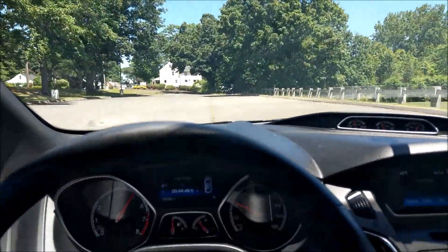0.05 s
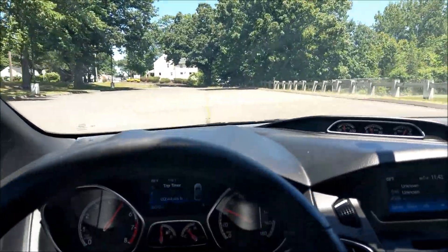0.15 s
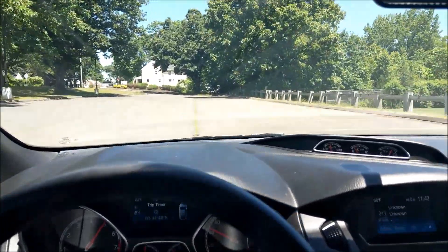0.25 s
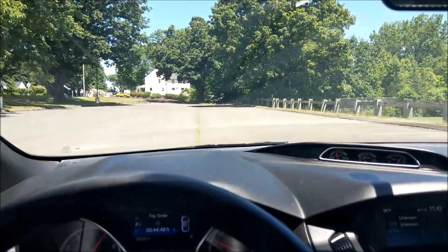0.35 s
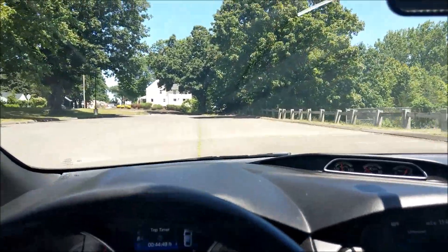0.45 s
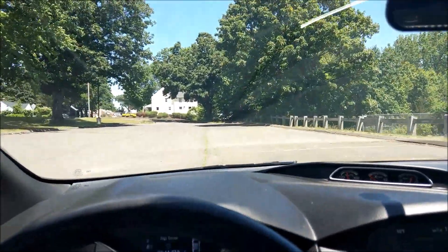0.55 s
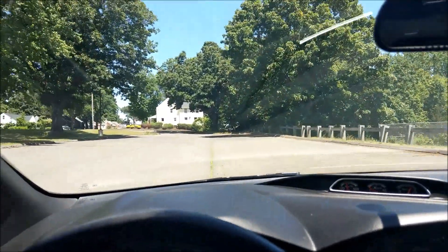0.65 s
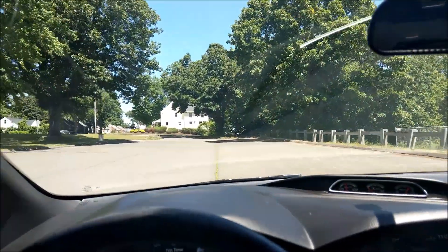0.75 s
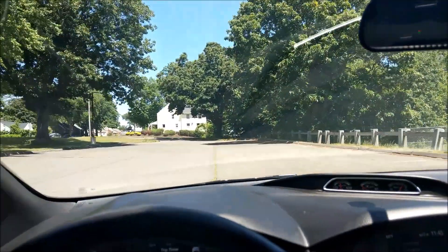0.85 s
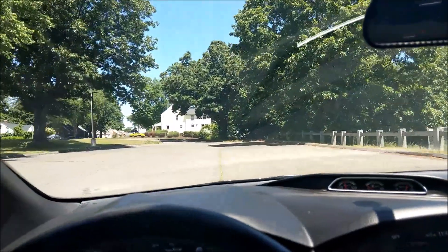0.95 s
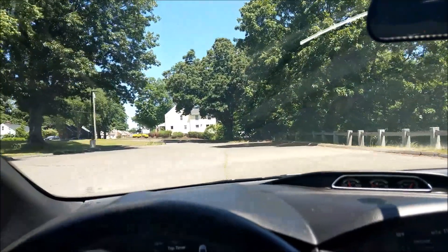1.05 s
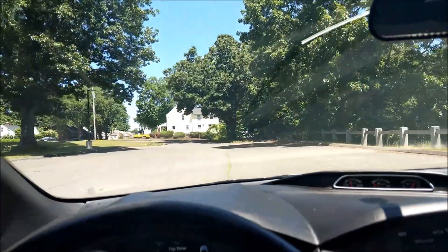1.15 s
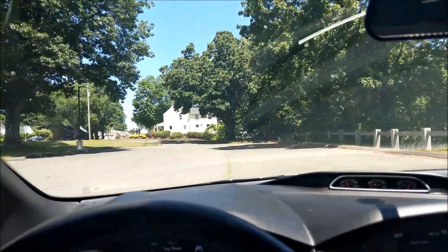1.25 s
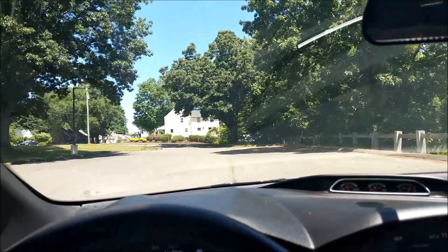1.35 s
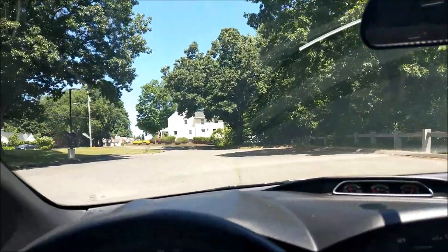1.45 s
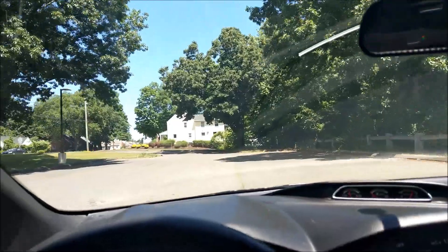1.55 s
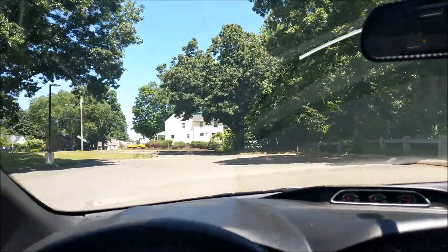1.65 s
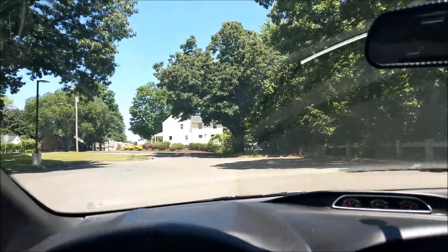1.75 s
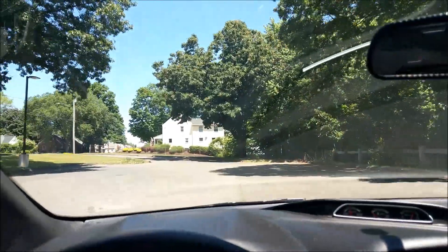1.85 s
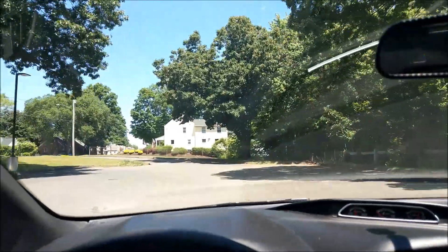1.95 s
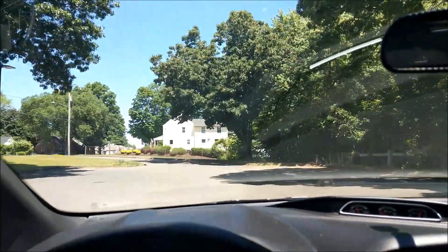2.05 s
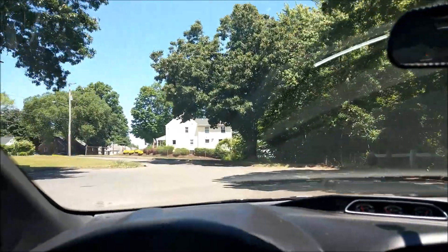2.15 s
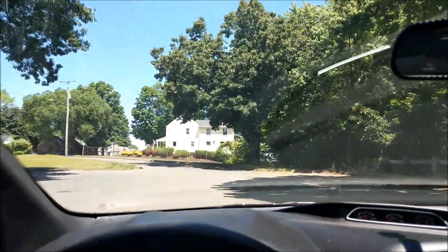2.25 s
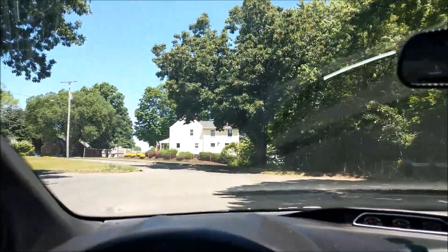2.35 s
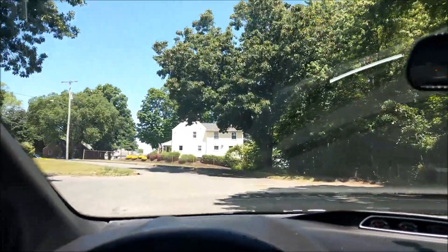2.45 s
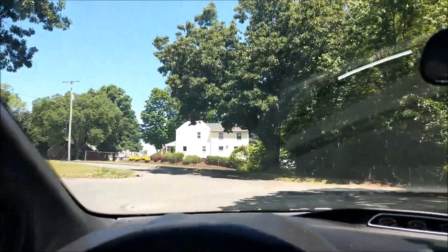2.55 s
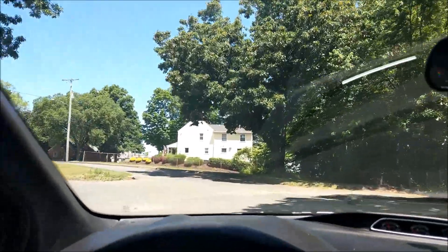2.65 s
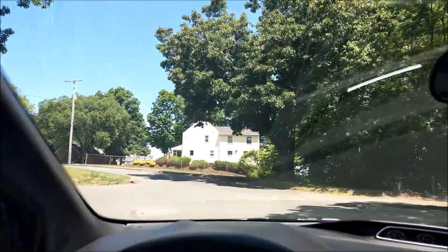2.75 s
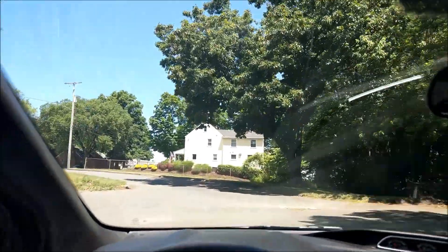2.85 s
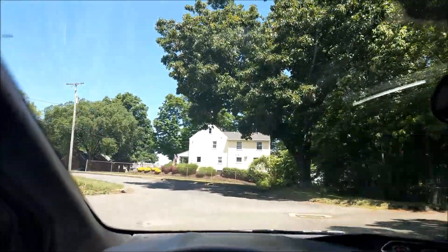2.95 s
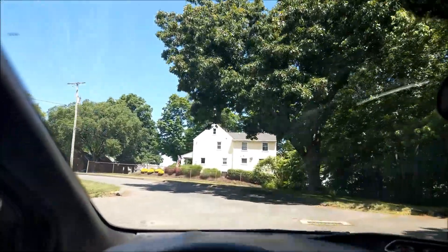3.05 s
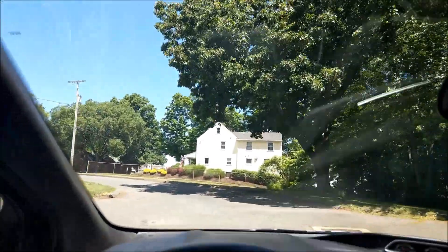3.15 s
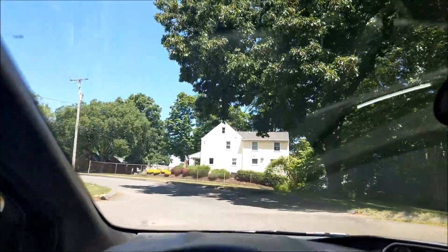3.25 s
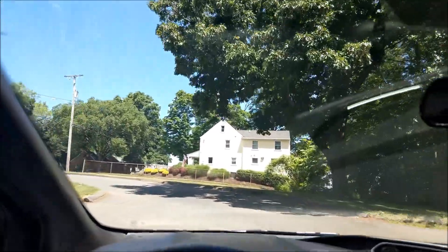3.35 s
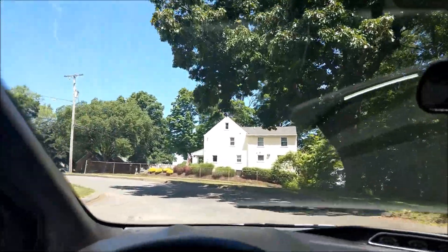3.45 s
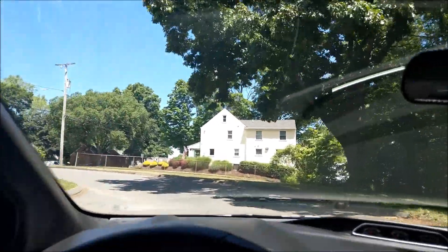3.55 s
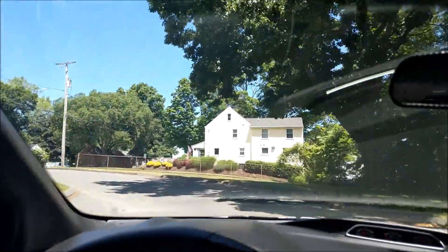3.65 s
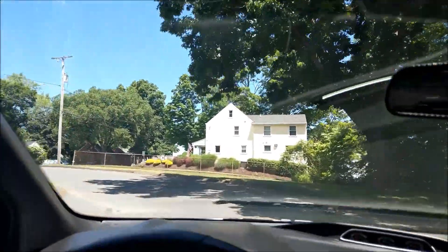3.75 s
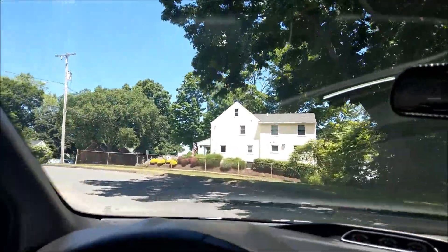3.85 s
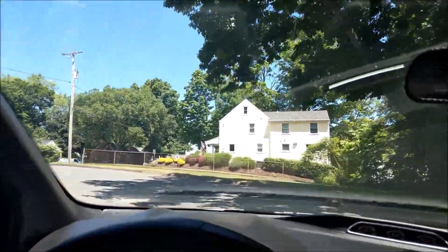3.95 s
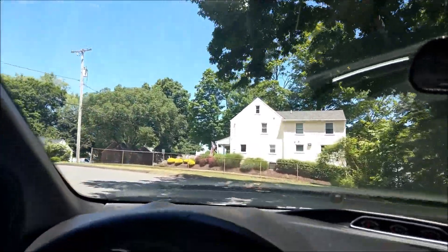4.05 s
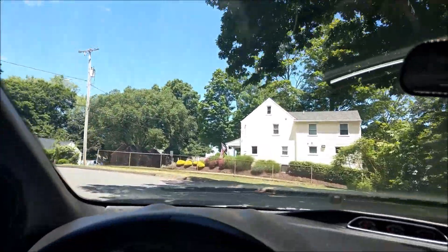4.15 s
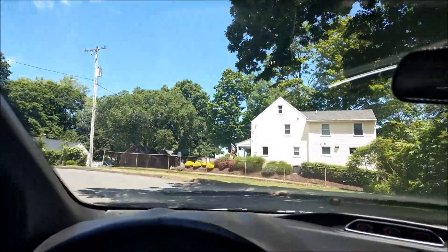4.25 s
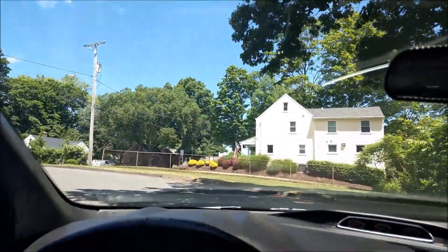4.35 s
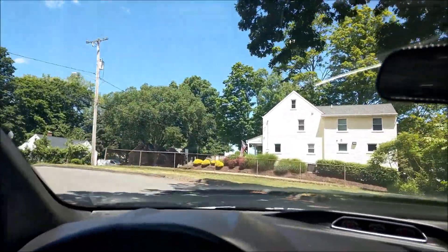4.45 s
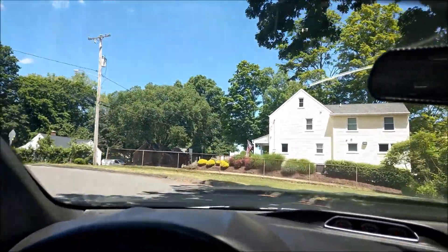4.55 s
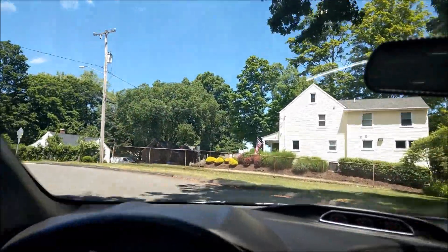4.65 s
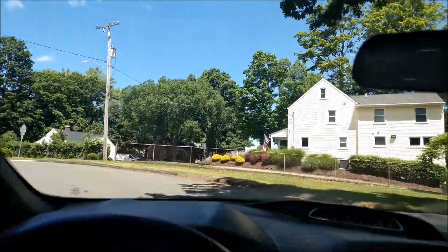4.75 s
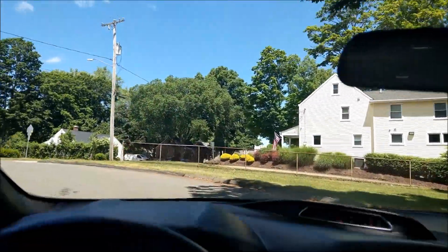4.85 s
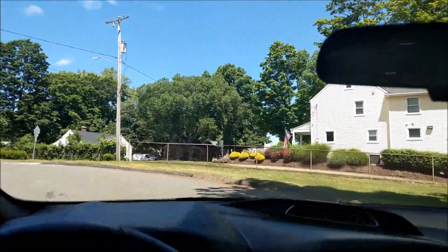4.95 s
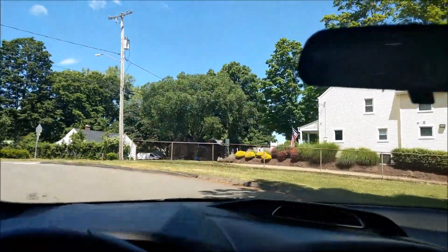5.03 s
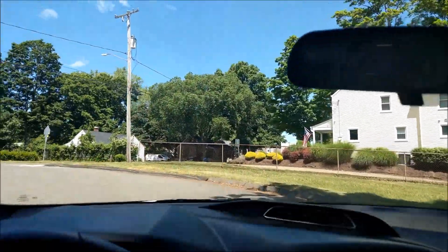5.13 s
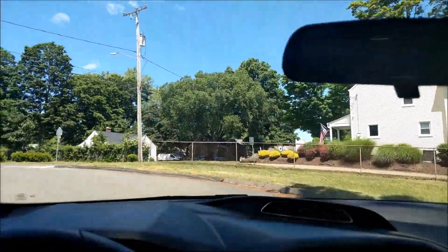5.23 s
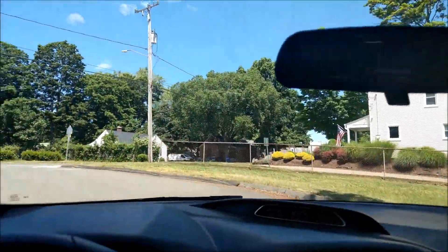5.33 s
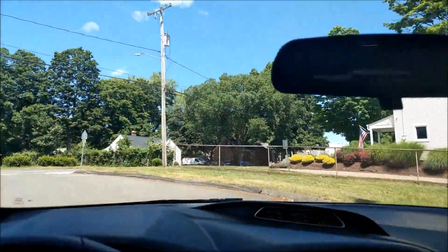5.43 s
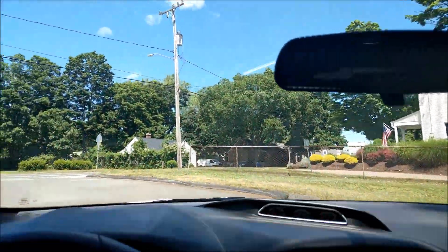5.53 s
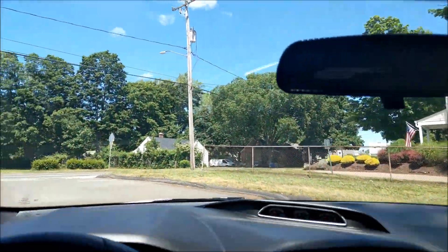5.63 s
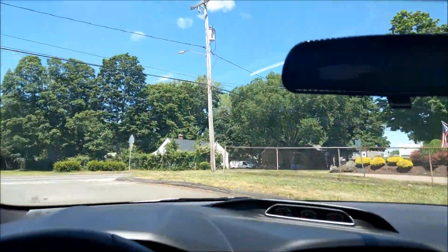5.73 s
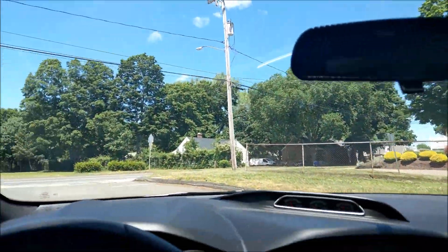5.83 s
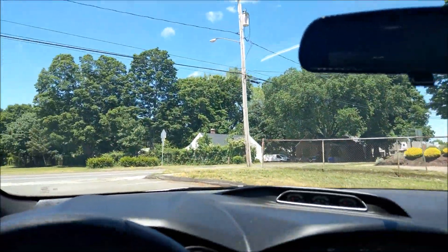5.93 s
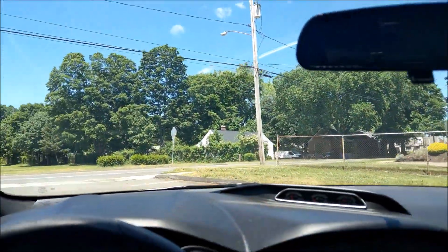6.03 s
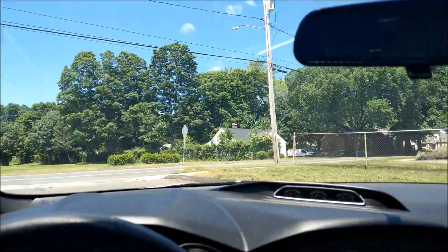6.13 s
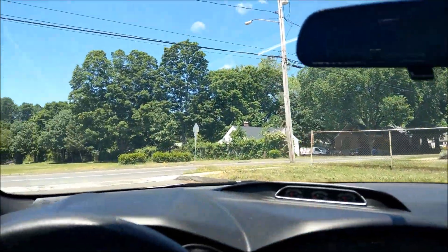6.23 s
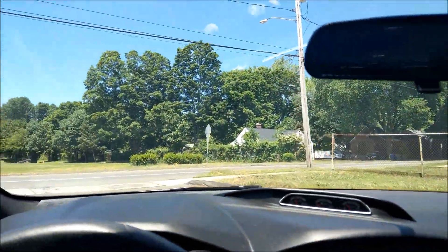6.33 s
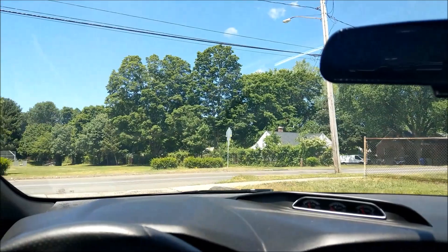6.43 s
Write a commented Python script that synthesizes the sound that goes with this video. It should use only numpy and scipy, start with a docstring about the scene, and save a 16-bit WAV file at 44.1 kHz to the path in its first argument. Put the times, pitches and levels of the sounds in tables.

```python
"""A turbocharged four-cylinder car engine, heard from the driver's seat. It growls under load, the
throttle shuts, and the car coasts down in gear while the firing tone sweeps through the cabin's boom.
Tyre noise falls with the revs and the body rocks over dips in the road. The plastic trim ticks and
creaks; the steering wheel slides through the hands and gives one faint squeak."""
import sys
import numpy as np
from scipy import signal
from scipy.fft import rfft, irfft
from scipy.io import wavfile
from scipy.ndimage import uniform_filter1d

SR = 44100
rng = np.random.default_rng(int(sys.argv[2]) if len(sys.argv) > 2 else 0)


def generate_wav(signal):
    """Clip the signal to [-1, 1] and save it as 16-bit WAV at the path in sys.argv[1]."""
    frames = np.transpose(np.atleast_2d(signal))
    scaled = np.clip(frames, -1, 1) * 32767
    pcm = np.round(scaled).astype(np.int16)
    wavfile.write(sys.argv[1], SR, pcm)


N = 286209
TIME = np.arange(N) / SR
BINS = np.fft.rfftfreq(N, 1 / SR)


def amp(db):
    """Decibels to gain."""
    return 10 ** (np.asarray(db) / 20)


def unit(x):
    """Scales to rms 1."""
    return x / np.sqrt(np.mean(x ** 2) + 1e-20)


def curve(rows, column=1):
    """One column of a time table as an automation curve."""
    rows = np.array(rows)
    return np.interp(TIME, rows[:, 0], rows[:, column])


def read(points, hz):
    """Reads a spectrum table on a log-frequency axis."""
    freqs, values = np.transpose(points)
    return np.interp(np.log(hz + 1), np.log(freqs + 1), values)


def wander(rate_hz):
    """Random drift of rms 1, up to about rate_hz."""
    return unit(irfft(rfft(rng.standard_normal(N)) * np.exp(-(BINS / rate_hz) ** 2), N))


def swell(peak_s, length_s):
    """A bell-shaped fade in and out."""
    return np.exp(-(2 * (TIME - peak_s) / length_s) ** 2)


def resonances(modes):
    """Gain spectrum of a set of steep-sided resonances."""
    return np.sqrt(sum((amp(db) / (1 + 2 * ((BINS - hz) / width) ** 2)) ** 2 for hz, width, db in modes))


def partial(turns, spread):
    """A sine that reaches the two ears with different phases."""
    return np.sqrt(2) * np.sin(2 * np.pi * turns + spread * rng.standard_normal() * np.array([[1], [-1]]))


# How alike the two ears sound: freq_hz, correlation
EAR_LIKENESS = [(20, 0.99), (140, 1), (230, 0.97), (350, 0.89), (600, 0.73), (1100, 0.5), (2400, 0.42),
                (4000, 0.034), (8000, 0), (12000, .3)]

def cabin_noise(gain):
    """Coloured stereo noise at a set level: centred in the bass, diffuse in the treble."""
    mid, side = rfft(rng.standard_normal((2, N)))
    likeness = read(EAR_LIKENESS, BINS)
    centre = irfft(mid * gain, N)
    spread = irfft(side * gain * np.sqrt((1 - likeness) / (1 + likeness + 1e-6)), N)
    return np.array([centre + spread, centre - spread]) / centre.std()


# The revs, and in one gear also the road speed: time_s, firing_hz
REVS = [(0.0, 163.9), (0.14, 170.9), (0.28, 161.1), (0.52, 166.0), (0.92, 163.5), (1.6, 150.3),
        (2.25, 137.2), (2.9, 119.0), (3.3, 107.8), (3.85, 94.7), (4.8, 79.1), (5.45, 70.8), (6.0, 58.0),
        (6.49, 48.7)]
# Fade of the growl as the throttle shuts: time_s, level_db
THROTTLE = [(0, -1.5), (.06, 1.5), (.12, 0), (.23, -3.5), (.29, -10.5), (.38, -19), (.55, -33), (.8, -64.5)]
# Partials of the growl: multiple_of_four_stroke_cycle, level_db
GROWL_PARTIALS = [(2, -39.5), (3, -43.5), (5, -48.5), (6, -43.5), (7, -30), (9, -36.5), (10, -34.5),
                  (11, -46.5), (12, -45.5), (13, -47.5), (14, -42.5), (15, -59.5), (16, -44), (17, -52),
                  (18, -68.5), (19, -52), (20, -64.5), (22, -56.5), (25, -62), (26, -58.5), (30, -62),
                  (36, -73.5)]

def intake(firings, rough=.2, rough_hz=16, smear=.2):
    """Unequal cylinders fill the gaps between the firing harmonics while the throttle is open."""
    out = np.zeros((2, N))
    for k, db in GROWL_PARTIALS:
        lag = smear * (k - 8) ** 2  # the ducts smear each pulse
        out += amp(db) * (1 + rough * wander(rough_hz)) * partial(firings * k / 4 - lag, spread=.4)
    return amp(curve(THROTTLE)) * out


# Cabin boom along the exhaust note: freq_hz, level_db
CABIN_BOOM = [(50, -36), (72, -39.5), (87, -35), (104, -30), (112, -23.5), (131, -17.5), (144, -27),
              (151, -36.5), (168, -46.5), (205, -42), (240, -50), (268, -39), (276, -29), (284, -36.5),
              (335, -42)]
# How hard the wheels turn the engine over: time_s, level_db
ENGINE_DRAG = [(0, 7), (1, 0.5), (2, 0.5), (3, -1), (4.4, -1.5), (5, -2.5), (5.6, -17), (6.49, -12)]

def exhaust(firings, boost_db=13.5, boost_ends_s=.26, bleed_s=.31, waver_hz=5, rough=.033):
    """Firing tone and octave swell through the boom; turbo boost lifts the octave, then bleeds off."""
    firing_hz = curve(REVS)
    boost = np.clip(1 - (TIME - boost_ends_s) / bleed_s, 0, 1)
    drone = amp(read(CABIN_BOOM, firing_hz) + wander(waver_hz)) * partial(firings, spread=.02)
    waver_db = 3.5 * (1 - boost) * wander(waver_hz)
    octave_db = read(CABIN_BOOM, 2 * firing_hz) - 6 + boost_db * boost + waver_db
    octave = amp(octave_db) * partial(2 * firings, spread=.21)
    return (drone + octave) * amp(curve(ENGINE_DRAG)) * (1 + rough * wander(rate_hz=14))


def slowing():
    """Octaves by which engine and wheels have dropped below their top speed."""
    firing_hz = curve(REVS)
    return np.log2(firing_hz.max() / firing_hz)


# Partials of the coasting engine: crank_order, level_db
CRANK_ORDERS = [(5, -9), (6, -0.5), (7, -2), (8, -3.5), (9, -2), (10, 0), (11, -0.5), (12, -3.5)]
# Standing waves in the cabin: freq_hz, width_hz, level_db
STANDING_WAVES = [(270.2, 13, -39.5), (324, 11, -48.5), (370.6, 31, -51.5), (459.6, 46, -51),
                  (513, 37, -58.5), (568.6, 17, -52), (653, 12, -65), (772, 70, -57), (1150, 360, -68),
                  (1830, 610, -79)]

def overrun(firings, upper_db=-7, fading_db=2, fall_db_per_octave=5):
    """Each crank order swells as it crosses a cabin resonance; all fade as the revs drop."""
    crank_hz = curve(REVS) / 2
    cabin = resonances(STANDING_WAVES)
    turns = firings / 2 + .009 * wander(rate_hz=18)  # the unloaded crank runs unevenly
    out = np.zeros((2, N))
    for order, db in CRANK_ORDERS + [(k, upper_db) for k in range(13, 28)]:
        gain = amp(db + fading_db * wander(rate_hz=2.9)) * np.interp(crank_hz * order, BINS, cabin)
        out += gain * partial(turns * order + rng.random(), spread=.35)
    return out * amp(curve(ENGINE_DRAG) - fall_db_per_octave * slowing())


# Roughness of the tarmac: time_s, level_db
ROUGHNESS = [(0, -5), (.35, -4), (1.2, 1), (2.1, 0), (3.6, -.5), (4.8, 0), (5.6, -3), (6.1, 1), (6.49, -3)]
# Low shake of the body: freq_hz, width_hz, level_db
BODY_SHAKE = [(21.6, 7.6, 2), (46.6, 13, -5.5)]
# Drumming of the tyres: freq_hz, width_hz, level_db
TYRE_DRUM = [(84.5, 22, -6), (118.8, 17.1, 3), (167, 80, -10), (217.7, 21.2, -4.5), (255, 80, -18.5)]
# Colour of the tread roar: freq_hz, level_db
TREAD_EQ = [(150, -39.5), (260, -4.5), (299, -3.5), (355, -6), (460, -8), (529, -14), (754, -12.5),
            (896, -17), (1050, -16), (1490, -26.5), (2800, -35), (3400, -47.5), (4420, -83.5), (7480, -120)]

def road(shake_db=-29, drum_db=-32.5, roar_db=-43.5):
    """The road shakes the body and drums the tyres; the tread roars. All fade as the car slows."""
    octaves_down, tarmac_db = slowing(), curve(ROUGHNESS)
    shake = amp(shake_db - 7.5 * octaves_down + tarmac_db) * cabin_noise(resonances(BODY_SHAKE))
    drum = amp(drum_db - 4.5 * octaves_down + .7 * tarmac_db) * cabin_noise(resonances(TYRE_DRUM))
    roar = amp(roar_db - 9.5 * octaves_down + wander(rate_hz=16)) * cabin_noise(amp(read(TREAD_EQ, BINS)))
    return shake + drum + roar


# Fader ride of the cabin rustle: time_s, level_db
RUSTLE_RIDE = [(0, -66), (.8, -69.5), (2.75, -71), (2.97, -76.5), (3.3, -75.5), (3.7, -76), (4.8, -76.5),
               (6.49, -81)]
# Colour of the rustle: freq_hz, level_db
RUSTLE_EQ = [(1650, -24.5), (2800, -3), (3400, -4), (4220, -3.5), (5240, -6), (7900, -6), (8860, -8.5),
             (9600, -19), (11800, -17), (14000, -20)]
# Colour of the microphone hiss: freq_hz, level_db
HISS_EQ = [(1000, 5.5), (8500, -7.5), (10000, 3.5), (14000, -3)]

def rustle(creaks_per_s=22, creak_db=1, creak_s=.0056, flutter_hz=14, hiss_db=-82):
    """Faint air and countless tiny creaks of the trim, over steady microphone hiss."""
    slips = (rng.random(N) < creaks_per_s / SR) * np.minimum(rng.exponential(1, N), 3)
    age = np.arange(4096) / SR / creak_s
    creaks = signal.oaconvolve(slips, age * np.exp(1 - age))[:N]
    crackle = np.sqrt(1 + amp(creak_db) ** 2 * abs(creaks))
    air = amp(curve(RUSTLE_RIDE) + wander(flutter_hz)) * cabin_noise(amp(read(RUSTLE_EQ, BINS)))
    hiss = amp(hiss_db) * cabin_noise(amp(read(HISS_EQ, BINS)))
    return crackle * air + hiss


# Throttle chuff, tarmac thuds and a knock: peak_s, length_s, level_db, pitch_hz, width_hz
PUFF_CUES = [(0.057, 0.11, -27.5, 110, 50), (0.247, 0.075, -38, 630, 90), (0.296, 0.065, -32, 160, 14),
             (0.543, 0.027, -20.5, 122, 34), (1.235, 0.1, -35, 219.4, 12), (3.04, 0.34, -35.5, 204.7, 25),
             (3.491, 0.18, -42, 234.4, 28), (4.583, 0.59, -36, 116.6, 13), (5.25, 0.016, -49, 591, 220)]

def puffs():
    """Each puff of noise swells and dies in one resonance."""
    return sum(amp(db) * swell(peak_s, length_s) * cabin_noise(resonances([(hz, width, 0)]))
               for peak_s, length_s, db, hz, width in PUFF_CUES)


# The drive coming off, then dips in the road: peak_s, length_s, level_db
JOLT_CUES = [(0.069, 0.2, -18), (2.076, 0.13, -28), (2.773, .14, -27), (3.865, 0.12, -26.5)]

def jolts(rock_hz=21):
    """Each jolt rocks the body on its mounts for a few cycles."""
    return sum(amp(db) * swell(peak_s, length_s) * np.cos(2 * np.pi * rock_hz * (TIME - peak_s))
               for peak_s, length_s, db in JOLT_CUES)


# Base colour of a tick: freq_hz, level_db
TICK_EQ = [(300, -15.5), (700, -2.5), (1300, 0.5), (2000, 2), (2800, 3), (3300, -2.5), (3900, 0),
           (5200, -3), (7800, 1), (9500, -8), (12000, -12.5), (14300, -28.5)]
# Ticks of the trim: start_s, level_db, tilt_db_per_octave, t60_s, panel_hz
TICK_CUES = [(.175, -38.5, -1, 0.076, 2660), (.183, -34, -2.5, 0.049, 3900),
             (.196, -47.5, -7.5, 0.29, 2660), (.283, -33.5, -9, 0.042, 1760), (.408, -37, -3, 0.054, 2880),
             (.85, -47.5, -2, .13, 1800), (1.082, -53.5, -2.5, .15, 2320), (1.316, -55.5, 1.5, .13, 3722),
             (1.672, -53.5, 2, 0.092, 3700), (2.028, -49, -0.5, .055, 3000),
             (2.124, -42.5, -0.5, 0.06, 11530), (2.436, -54, 2.5, .1, 7900), (2.585, -55.5, 0, 0.084, 3010),
             (2.715, -52, 1, .057, 3340), (2.813, -48, 1, 0.051, 2900), (2.893, -46.5, -5, 0.047, 3100),
             (3.161, -57, 5, 0.13, 11200), (3.247, -41, -6, 0.047, 2900), (3.251, -39, -1, 0.047, 4300),
             (3.327, -43.5, -0.5, 0.025, 2900), (3.413, -38.5, -2.5, 0.074, 1180),
             (3.636, -51, -.5, .054, 2738), (3.866, -51.5, -5, 0.25, 1600), (4.141, -53, -4.5, .16, 1880),
             (4.25, -51.5, 0, .06, 2900), (4.444, -57, 1, .09, 6740), (5.095, -51.5, -1, 0.069, 1890),
             (5.241, -49, -5.5, 0.056, 2200), (5.552, -46.5, -12.5, 0.077, 1510),
             (5.767, -50, -9, 0.049, 2800), (5.895, -52, -8.5, 0.041, 2890),
             (6.255, -48.5, -12, .063, 1487), (6.331, -56.5, -8.5, 0.061, 1700)]

def trim(rise_s=.0038, tail_db=-23, tail_t60_s=.72, ripple_db=3.7, panel_db=6):
    """Plastic joints slip; each rings its own panel and is smeared by close reflections in the cabin."""
    out, size = np.zeros((2, N + SR)), 8192
    t, hz = np.arange(size) / SR, np.fft.rfftfreq(size, 1 / SR)
    likeness = read(EAR_LIKENESS, hz)
    attack = 1 - np.exp(-(t / rise_s) ** 2)
    for start_s, db, tilt, t60_s, panel_hz in TICK_CUES:
        ripple = ripple_db * unit(uniform_filter1d(rng.standard_normal(len(hz)), 60))
        width_hz = 260 * np.sqrt(panel_hz / 3000)  # higher modes are wider
        panel = panel_db / (1 + ((hz - panel_hz) / width_hz) ** 2)
        colour = amp(read(TICK_EQ, hz) + tilt * np.log2((hz + 300) / 3500) + ripple + panel)
        shared, *per_ear = rfft(rng.standard_normal((3, size)))
        noise = np.sqrt(likeness) * shared + np.sqrt(1 - likeness) * np.array(per_ear)
        burst = unit(irfft(colour * noise))
        decay = amp(-60 * t / t60_s) + amp(tail_db - 60 * t / tail_t60_s)
        start = round(start_s * SR)
        out[:, start:start + size] += amp(db) * burst * attack * decay
    return out[:, :N]


# Hands on the steering wheel: peak_s, length_s, level_db, centre_hz, width_octaves
RUB_CUES = [(.55, 0.097, -62.5, 4500, 1.3), (3.12, 0.11, -76, 4340, 0.21), (3.46, 0.1, -83, 3985, .9),
            (4.655, 0.05, -75, 2300, 0.29), (4.862, .16, -71.5, 4500, 1.92)]

def wheel_rubs():
    """The rim slides over skin in short, soft swishes."""
    out = np.zeros((2, N))
    for peak_s, length_s, db, hz, octaves in RUB_CUES:
        band = np.exp(-(np.log2((BINS + 1) / hz) / octaves) ** 2 / 2)
        out += amp(db) * swell(peak_s, length_s) * cabin_noise(band * amp(read(RUSTLE_EQ, BINS)))
    return out


# Arc of the steering wheel's squeak: time_s, pitch_hz, level_db
SQUEAK_ARC = [(3.27, 4098, -95), (3.33, 4340, -75), (3.42, 4750, -76), (3.49, 4450, -79), (3.54, 4200, -95)]

def wheel_squeak(width_hz=220):
    """A thin, airy friction tone that rises and falls as the wheel turns."""
    turns = np.cumsum(curve(SQUEAK_ARC)) / SR
    gate = (TIME > SQUEAK_ARC[0][0]) & (TIME < SQUEAK_ARC[-1][0])
    return gate * amp(curve(SQUEAK_ARC, column=2)) * wander(width_hz) * partial(turns, spread=.89)


def scene():
    """One crankshaft drives all engine layers, over the road and the small sounds of the cabin."""
    firings = np.cumsum(curve(REVS)) / SR
    engine = intake(firings) + exhaust(firings) + overrun(firings)
    bumps = puffs() + jolts()
    return engine + bumps + road() + rustle() + trim() + wheel_rubs() + wheel_squeak()


# Colour difference between the two microphones: freq_hz, left_minus_right_db
STEREO_EQ = [(150, 0.8), (240, 1.3), (330, -1), (480, 0.5), (1000, 0), (2000, -1.1), (4000, 2), (8000, 1),
             (12000, -0.5)]

def record(dry, cutoff_hz=14300):
    """Each microphone colours its side; a steep low-pass takes off the top."""
    balance_db = read(STEREO_EQ, np.fft.rfftfreq(2 * N, 1 / SR))
    coloured = irfft(rfft(dry, 2 * N) * amp([balance_db / 2, -balance_db / 2]))[:, :N]
    lowpass = signal.firwin(511, cutoff_hz, window=("kaiser", 9), fs=SR)
    return signal.oaconvolve(coloured, lowpass[None], "same")


dry = scene()
out = record(dry)
generate_wav(out)
```